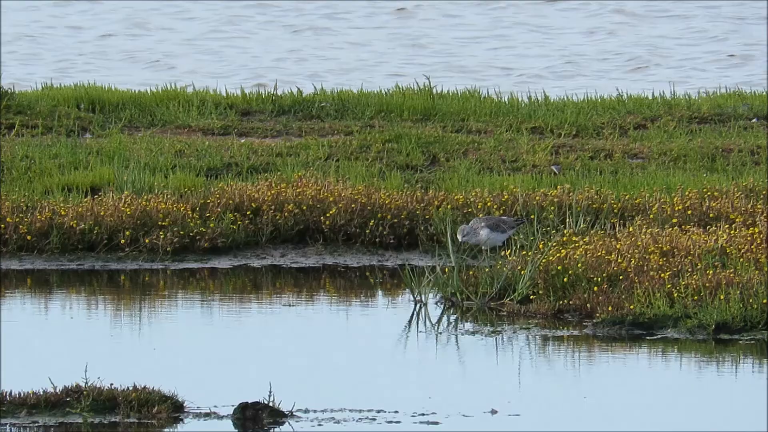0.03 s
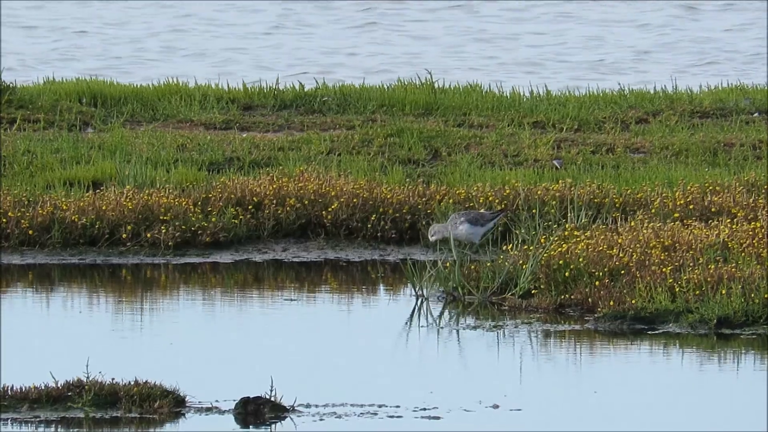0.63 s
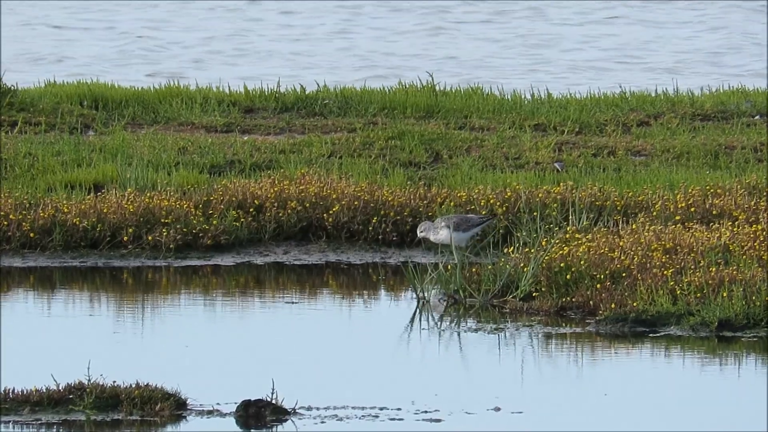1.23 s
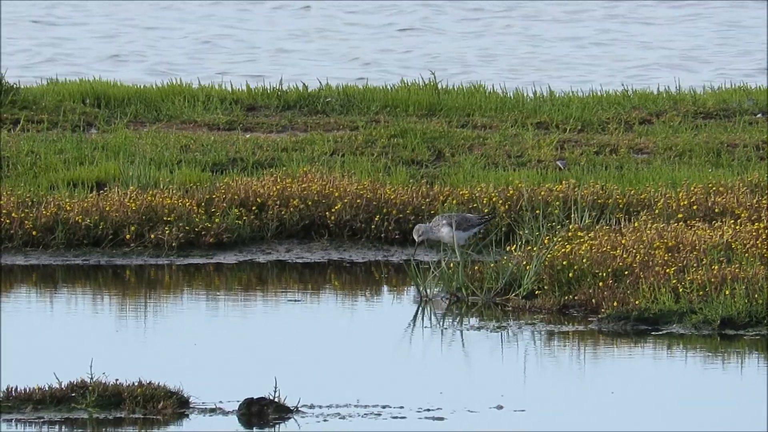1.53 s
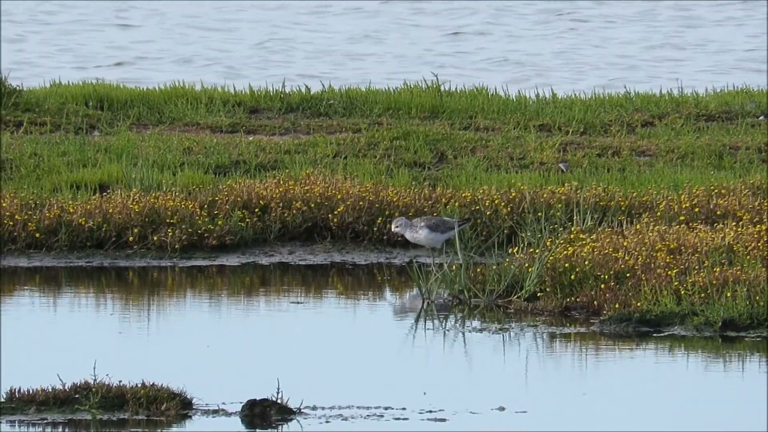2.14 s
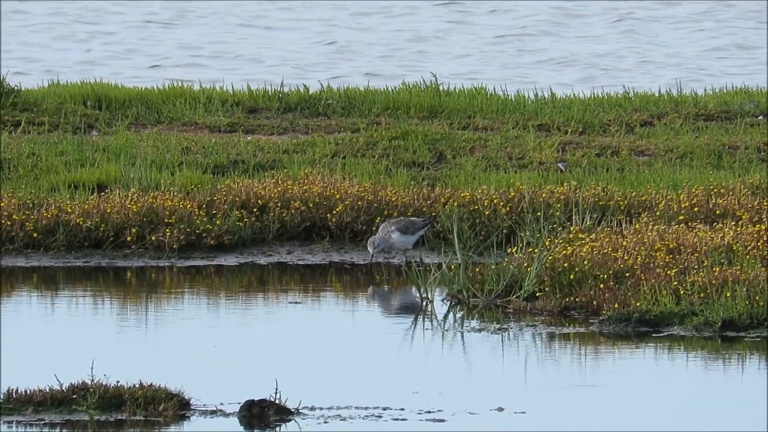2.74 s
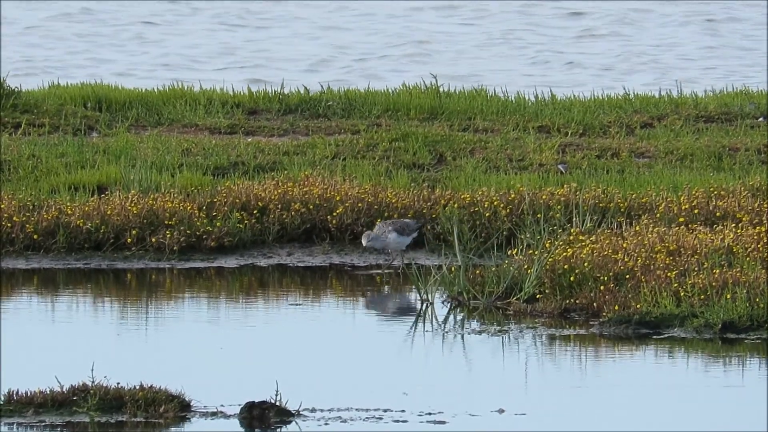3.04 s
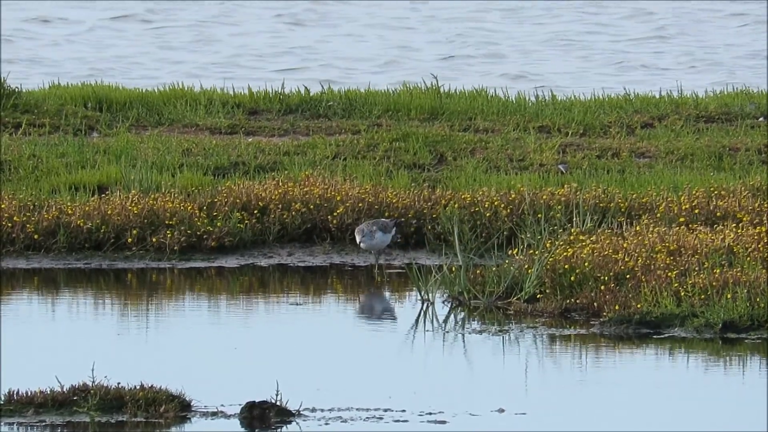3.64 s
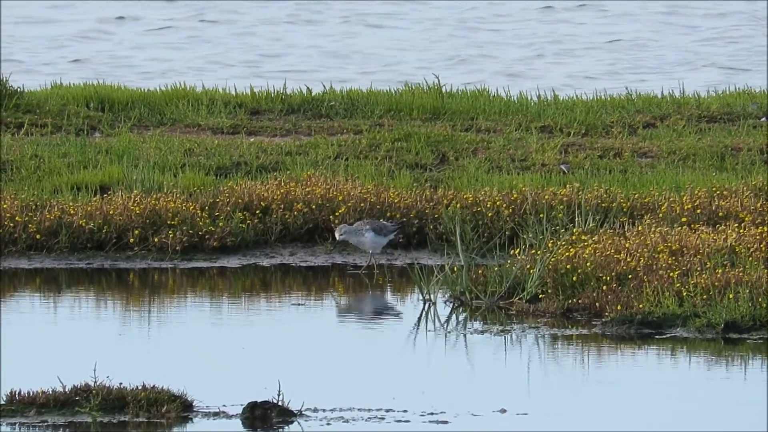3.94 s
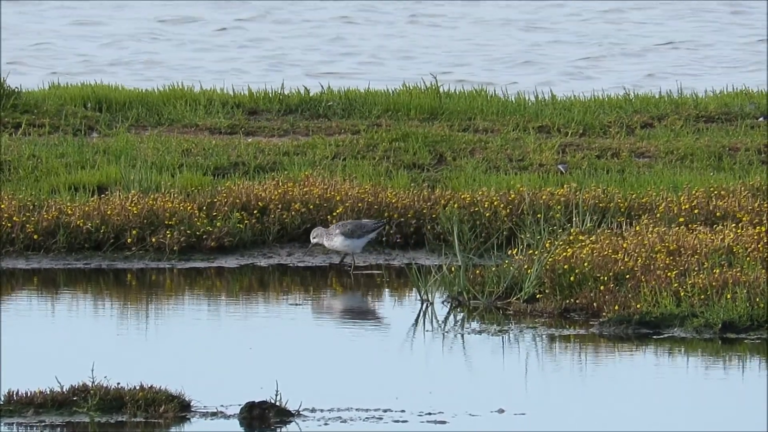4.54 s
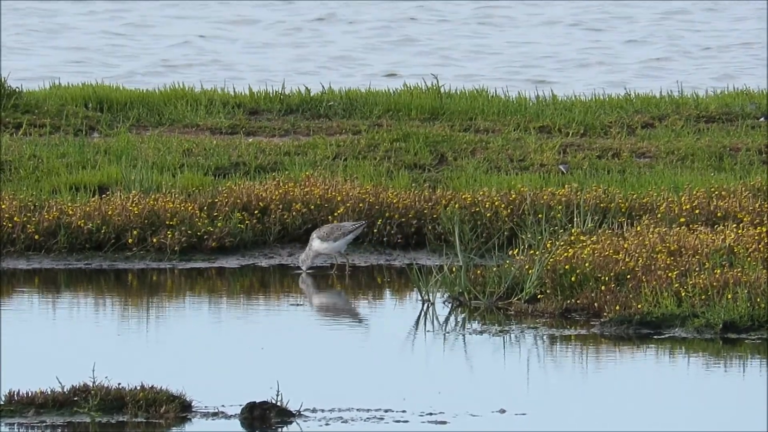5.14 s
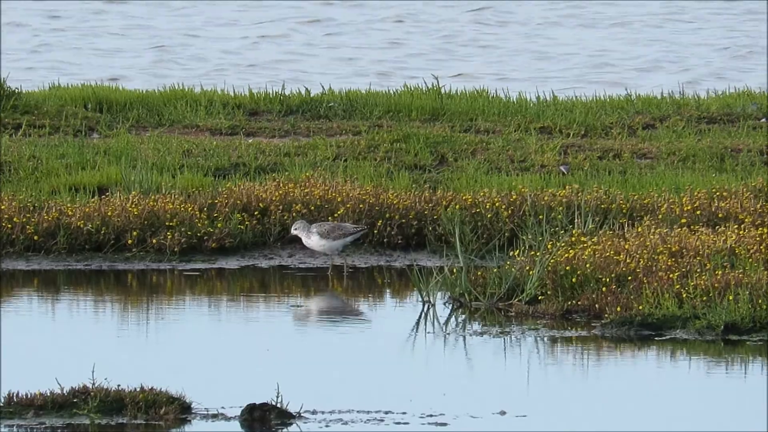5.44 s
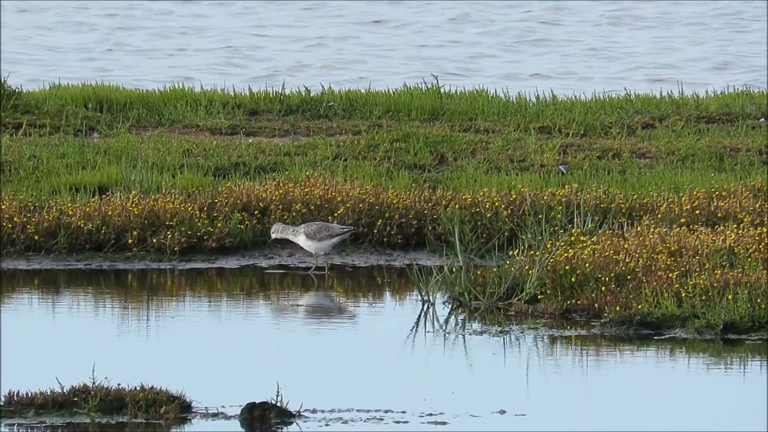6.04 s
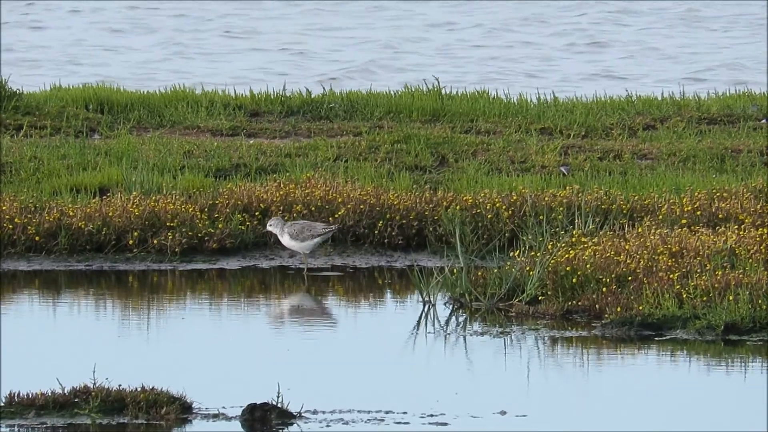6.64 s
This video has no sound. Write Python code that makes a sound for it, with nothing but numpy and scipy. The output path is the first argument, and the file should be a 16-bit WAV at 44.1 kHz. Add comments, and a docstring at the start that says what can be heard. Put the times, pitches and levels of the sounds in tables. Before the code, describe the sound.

A small bird chirps and whistles over harsh, overlapping gull calls, a soft marsh wash and low wind buffeting.

```python
"""A colony of gulls rasps across a salt marsh: each call is a fluttering harmonic series, shaped by
the resonances of throat and bill. Closer by, a small songbird twitters, modulating the nearly pure tone
of its syrinx into whistles, flicks, ticks, arches, scratches, chips, buzzes and two-voiced notes.
Grass and banks scatter the calls over a wash of distant colony and air. Gusts buffet the two
microphone ports with low rumbles and thuds, and the sound fades in at the start."""
import sys
import numpy as np
from scipy import signal
from scipy.fft import rfft, irfft, next_fast_len
from scipy.io import wavfile
from scipy.ndimage import map_coordinates

SR = 44100
rng = np.random.default_rng(int(sys.argv[2]) if len(sys.argv) > 2 else 0)


def master(y):
    """Save y as 16-bit WAV."""
    cut = np.clip(np.atleast_2d(y).T, -1, 1)
    pcm = np.round(cut * 32767)  # scale
    wavfile.write(sys.argv[1], SR, pcm.astype(np.int16))


N = 303849

# Noise spectra. Each row: frequency in Hz, spectral density in relative dB.
WASH_SPECTRUM = [(25, -0.5), (70, 9), (280, 1.5), (430, 4.5), (560, -4.5), (800, 5.5), (1000, -2.5),
                 (1400, 0), (1850, 2), (2500, -7), (4100, -8), (5300, -18), (14000, -34)]
LIGHT_WIND_SPECTRUM = [(25, -27), (80, -1), (150, -7.5), (280, -23.5), (800, -84)]
HARD_WIND_SPECTRUM = [(30, -31), (70, -7), (150, 9), (250, 3.5), (470, -12), (600, -28.5), (2000, -100)]
# Likeness of left and right. Each row: frequency in Hz, correlation from 0 to 1.
WASH_COHERENCE = [(100, 1), (400, 0.35), (1200, 0.77), (4500, 0.38), (7500, 0.0167)]
WIND_COHERENCE = [(30, .8), (140, .45), (280, .1)]
# The breeze between gusts. Each row: time in seconds, level in dB.
BREEZE = [(.5, -60.5), (2.8, -47.5), (3.0, -63), (3.85, -65), (4.1, -49), (4.95, -43), (5.65, -56)]
# Gusts. Each row: start and length in seconds, level in dB, hardness from 0 to 1.
GUSTS = [(0.629, 0.28, -37, 0.08), (0.856, 0.11, -24.5, 0.18), (0.963, 0.14, -27, 0.7),
         (1.205, 0.25, -40, 0.05), (1.653, 0.07, -33.5, 0), (2.026, 0.19, -34.5, 0.46),
         (2.345, 0.31, -36, 0.07), (4.471, 0.044, -31, 0.04), (4.505, 0.086, -19, 1),
         (4.555, 0.13, -36, 0.45), (5.188, 0.2, -33, 1), (5.344, 0.27, -38.5, 0.97),
         (5.749, 0.1, -35, 0.66), (6.004, 0.29, -35.5, 0.88), (6.543, 0.37, -29.5, 0.96)]
# Single eddies. Each row: time in seconds, peak in dB, centre frequency in Hz.
EDDIES = [(1.098, -10.5, 186), (4.532, -3.5, 280), (4.547, -7, 230), (5.222, -10, 337), (5.333, -7.5, 280),
          (6.773, -10, 251)]
# Resonances of a gull's throat. Each row: frequency in Hz, gain in dB.
THROAT = [(600, -24), (1120, -5), (1400, -9), (1850, 2), (2300, -2), (2700, -9), (3200, -12), (3700, -13),
          (4350, -5.5), (4850, -12), (5500, -26), (7000, -32), (10000, -48)]
# Nearer gulls. Each row: start and length in seconds, pitch aimed at in Hz, level in dB,
# harshness from 0 to 1, treble gain in dB.
GULL_CALLS = [(0.486, 0.94, 636.7, -53.5, 0.32, 3.5), (1.168, 0.39, 1097, -45.5, 0.69, -5.5),
              (1.675, 0.3, 920, -54.5, 0, -27), (1.963, 0.5, 1065, -42, 0.99, 4),
              (2.707, 0.23, 972, -50.5, 0.15, 0), (3.156, 0.27, 1127, -46.5, 0.56, 6),
              (3.318, 0.19, 925, -42.5, 0.8, 4), (3.42, 0.43, 1170, -44, 0.98, -2),
              (4.016, 0.43, 1165, -40, 0.71, -2.5), (4.895, 0.32, 975, -45.5, 0.89, -2),
              (5.117, 0.25, 1152, -42.5, 0.85, 0), (5.932, 0.19, 919, -42, 0.4, -10),
              (6.051, 0.28, 1151, -46, 0.74, -3), (6.263, 0.64, 1145, -41.5, 0.83, -1)]
# Clear cries. Each row: start and length in seconds, pitch in Hz, level and relative octave in dB.
CRIES = [(2.17, 0.13, 2126, -40, 0), (3.485, 0.15, 2040, -44.5, -6.5), (4.804, 0.14, 2070, -42.5, -8.5),
         (5.981, 0.13, 2070, -34, -25)]
# The contour of a cry. Each row: share of its length, pitch ratio, gain in dB.
CRY_SHAPE = [(0, .98, -1), (.32, 1, 0), (.5, 1.08, -4), (.64, 1.16, -7), (1, 1.07, -15)]
# Runs of pips. Each row: start and length in seconds, pips per second, base level in dB,
# growth of the fundamental over the run in dB.
STUTTERS = [(5.839, .032, 111, -42, 0), (5.889, .085, 52.6, -39.5, 6)]
# Held whistles. Each row: start and length in seconds, middle pitch in Hz, overall glide in Hz,
# bend of the middle above the ends in Hz, level in dB.
WHISTLES = [(0.227, 0.08, 3730, 750, -120, -41.5), (0.956, 0.097, 3610, 6, -130, -47),
            (1.494, 0.039, 3570, 700, -60, -46.5), (1.631, 0.049, 4050, -42, -42, -44.5),
            (1.897, 0.046, 5400, 1150, 2, -62)]
# Notes of fixed length. Each row: start in seconds, level in dB.
FLICKS = [(0.267, -40), (0.319, -41), (0.868, -48.5), (1.01, -47), (1.322, -47), (1.518, -52), (1.662, -45),
          (1.88, -42)]
SCRATCHES = [(3.08, -47), (4.952, -46), (5.038, -45), (5.119, -45)]
# Falling ticks. Each row: start in seconds, top pitch in Hz, level in dB.
TICKS = [(2.35, 4150, -46.5), (3.853, 4240, -47), (4.318, 4180, -48), (4.354, 3430, -46.5)]
# Four ticks, high-low-low-high. Each row: delay in seconds, top pitch in Hz, level in dB.
TICK_FIGURE = [(0, 4290, -47), (0.042, 3090, -48.5), (0.083, 3000, -49), (.122, 3770, -46)]
# Each entry: start of one such figure in seconds.
FIGURE_STARTS = [2.455, 4.453]
# Arched notes. Each row: start in seconds, level in dB before the note's lift.
ARCHES = [(2.712, -67), (2.869, -65), (4.719, -62), (4.859, -64), (5.076, -64.5), (5.259, -64.5)]
# Nasal chips. Each row: start and length in seconds, level in dB.
CHIPS = [(3.145, 0.06, -45), (3.67, 0.055, -47), (3.914, 0.077, -44.5)]
# Buzzes. Each row: start and length in seconds, first and last pitch in Hz, level in dB.
BUZZES = [(3.621, 0.029, 3900, 3800, -46.5), (6.103, 0.044, 3760, 3760, -45)]
# Two-voiced notes. Each row: start in seconds, level in dB, relative upper voice in dB.
CHINKS = [(5.504, -45, -29), (5.728, -43, -9), (5.968, -43, -19), (6.212, -41.5, -6.5), (6.479, -47.5, -18)]
# The fade-in. Each row: time in seconds, gain in dB.
FADE_IN = [(.095, -70), (.125, -26), (.46, -11), (.52, 0)]

NOTE_SCATTER = .02  # relative spread of pitch among repeated notes


def amp(db):
    """Decibels to amplitude ratio."""
    return 10 ** (np.asarray(db) / 20)


def unit(x):
    """Normalisation to rms 1."""
    return x / np.sqrt(np.mean(x ** 2) + 1e-20)


def along(points, hz):
    """Interpolation of (Hz, value) points on a log axis."""
    f, v = np.transpose(points)
    return np.interp(np.log(hz + 1), np.log(f + 1), v)


def curve(rows):
    """Interpolation of (seconds, value) rows at every sample."""
    return np.interp(np.arange(N) / SR, *np.transpose(rows))


def wobble(rate, size):
    """Smooth random modulation, rate knots a second."""
    knots = rng.standard_normal(int(size * rate / SR) + 4)
    return map_coordinates(knots, [np.arange(size) * rate / SR])


def filtered(x, response):
    """Linear filtering: the spectrum times a frequency response."""
    size = x.shape[-1]
    m = next_fast_len(size + SR // 10)
    return irfft(rfft(x, m) * response(np.fft.rfftfreq(m, 1 / SR)), m)[..., :size]


def rush(spectrum, coherence):
    """Stereo noise of rms 1; the balance of mid and side sets its coherence."""
    def response(hz):
        angle = np.arccos(np.clip(along(coherence, hz), -1, 1)) / 2
        return amp(along(spectrum, hz)) * [np.cos(angle), np.sin(angle)]
    mid, side = filtered(rng.standard_normal((2, N)), response)
    return unit(np.array([mid + side, mid - side]))


def add(track, s, sound):
    """Superposition of a sound on a track from s seconds."""
    start = max(round(s * SR), 0)
    room = track[start:start + len(sound)]
    room += sound[:len(room)]


def progress(length):
    """Normalised time, 0 to 1 over length seconds."""
    return np.linspace(0, 1, max(int(length * SR), 2))


def phase(hz):
    """Phase as the integral of frequency."""
    return 2 * np.pi * np.cumsum(hz) / SR


def swell(u):
    """An envelope with a soft start and end."""
    return np.sqrt(np.abs(np.sin(np.pi * u)))


def arch(u, foot_hz, middle_hz):
    """A parabolic pitch contour, turning at mid-note."""
    return middle_hz + (foot_hz - middle_hz) * (2 * u - 1) ** 2


def syrinx(pitch_hz, overtone_db=-31, waver=.011):
    """A nearly sinusoidal oscillation of rms 1, with jitter in pitch and shimmer in strength."""
    size = len(pitch_hz)
    p = phase(pitch_hz * (1 + waver * wobble(373.7, size)))
    overtones = amp(overtone_db) * np.sin(2 * p) + amp(2.1 * overtone_db) * np.sin(3 * p)
    return unit(amp(2.2 * wobble(190, size)) * (np.sin(p) + overtones))


def marsh_wash(level_db=-48.9):
    """Incoherent sources, the distant colony and the air, sum to nearly steady noise."""
    return amp(level_db + wobble(4.33, N) / 2) * rush(WASH_SPECTRUM, WASH_COHERENCE)


def wind(lump_db=3.8, sway_db=3, edge_s=.012):
    """Turbulent pressure at the ports: abrupt gusts over a breeze; hard ones reach higher frequencies."""
    light, hard = amp(curve(BREEZE) + sway_db * wobble(36, N)), np.zeros(N)
    for s, length, db, hardness in GUSTS:
        u = progress(length)
        edges = np.minimum(1, np.minimum(u, 1 - u) * length / edge_s)
        push = amp(db) * unit(edges * swell(u) * amp(lump_db * wobble(42.1, len(u))))
        add(light, s, np.sqrt(1 - hardness) * push)
        add(hard, s, np.sqrt(hardness) * push)
    rumble = light * rush(LIGHT_WIND_SPECTRUM, WIND_COHERENCE)
    return rumble + hard * rush(HARD_WIND_SPECTRUM, WIND_COHERENCE)


def gull(length, top_hz, harsh, treble_db, rise_s=.014, hold=.42, rest_hz=506, sag_s=.48, rattle_hz=64):
    """Source and filter: a rattling voice rises and sags; its resonance drops as the bill closes."""
    u = progress(length)
    t, size = u * length, len(u)
    closing = np.clip((u - hold) / (1 - hold), 0, 1)
    effort = amp(-10 * closing) * (1 - np.exp(-t / rise_s)) * np.minimum(1, 10 * (1 - u))
    strain = harsh * np.sqrt(effort)
    rattle = phase(rattle_hz * np.exp(.14 * rng.normal() + .34 * wobble(90, size)))
    sag_hz = (top_hz - rest_hz) * (1 - np.exp(-length / sag_s))
    pitch = (top_hz - sag_hz * u ** 1.5) * (1 - .22 * np.exp(-t / rise_s / 3))
    shake = (.014 + .022 * strain) * np.sin(rattle + 1) + .032 * strain * wobble(520, size)
    p = phase(pitch * (1 + .012 * wobble(18, size) + shake))

    def partial(k):
        """A shimmering line at k times the pitch; fractional ones also wander in phase."""
        shimmer = amp((2 + 2 * strain) * wobble(70, size))
        offset = rng.uniform(0, 2 * np.pi)
        wander = k % 1 * 3 * strain * wobble(60, size)
        return shimmer * np.sin(k * p + offset + wander)

    # period tripling: under strain the syrinx repeats only every third cycle
    subharmonics = sum(partial(k / 3) for k in range(4, 28) if k % 3)
    voice = unit(sum(partial(k) for k in range(1, 10)) + (.1 + .8 * strain) * subharmonics)
    pulsed = voice * amp((1.2 + 2 * strain) * np.cos(rattle) + 1.5 * wobble(45, size))

    def bill(ring_hz, ring_db):
        """The voice filtered by the throat and one resonance of the bill."""
        throat = lambda hz: along(THROAT, hz) + treble_db * np.log2(np.clip(hz / 2000, 1, 2))
        ring = lambda hz: ring_db * np.exp(-((hz - ring_hz) / 300) ** 2)
        return filtered(pulsed, lambda hz: amp(throat(hz) + ring(hz)))

    return effort * unit((1 - closing) * bill(2300, 2) + closing * bill(1550, 5))


def colony(far_db=-55, far_count=38):
    """Superposition of the nearer gulls and many fainter, smoother calls far off."""
    out = np.zeros(N)
    for s, length, top_hz, db, harsh, treble_db in GULL_CALLS:
        add(out, s, amp(db) * gull(length, top_hz, harsh, treble_db))
    for i, (when, size, pitch, rough, near) in enumerate(rng.random((far_count, 5))):
        call = gull(.25 + .3 * size, 760 + 380 * pitch, .25 * rough, treble_db=-1)
        add(out, (i + when) / far_count * N / SR, amp(far_db + 6 * (near - .5)) * call)
    return out


def shore_echo(birds, banks_s=.45, grass_s=.09):
    """Reverberation: quick scatter off the grass and a faint tail from the banks, different per ear."""
    t = np.arange(SR // 2) / SR
    banks = rng.standard_normal((2, len(t))) * amp(-60 * t / banks_s)
    grass = rng.standard_normal(len(t)) * amp(-60 * t / grass_s) * (t > .003)
    response = amp(-14) * banks / np.linalg.norm(banks[0]) + amp(-12) * grass / np.linalg.norm(grass)
    return signal.fftconvolve(birds[None], response, axes=1)[:, :N]


def whistles(out):
    """Sustained oscillation whose pitch glides and bends."""
    for s, length, hz, glide_hz, bend_hz, db in WHISTLES:
        u = progress(length)
        pitch = arch(u, hz - bend_hz, hz) + glide_hz * (u - .5)
        add(out, s, amp(db) * swell(u) * syrinx(pitch, waver=.02))


def flicks(out, length=.02, from_hz=2500, to_hz=4150):
    """Fast upward frequency sweeps."""
    u = progress(length)
    for s, db in FLICKS:
        pitch = (1 + NOTE_SCATTER * rng.normal()) * (from_hz + (to_hz - from_hz) * u ** 1.5)
        add(out, s, amp(db) * swell(u) * syrinx(pitch, waver=.03))


def thuds(lag_s=.00063, cutoff_hz=600):
    """Each eddy is one pressure dip; the stronger it is, the more the two ports differ in timing."""
    out = np.zeros((2, N))
    t = np.arange(-SR // 20, SR // 20) / SR
    for (s, db, eddy_hz), side in zip(EDDIES, np.sign(rng.standard_normal(len(EDDIES)))):
        for port, sign in zip(out, (side, -side)):
            u = np.pi * eddy_hz * (t + sign * lag_s * np.sqrt(amp(db)))
            add(port, s + t[0], amp(db) * (2 * u * u - 1) * np.exp(-u * u))
    return filtered(out, lambda hz: 1 / (1 + (hz / cutoff_hz) ** 10))


def gull_cries(out, flutter_hz=88):
    """Upslurred tones that start rough and clear as their amplitude modulation dies away."""
    share, ratio, shape_db = np.transpose(CRY_SHAPE)
    for s, length, hz, db, octave_db in CRIES:
        u = progress(length)
        flutter = 1 + 1.2 * (1 - u) ** 4 * np.sin(2 * np.pi * flutter_hz * length * u - 2)
        pitch = hz * np.interp(u, share, ratio)
        tone = amp(np.interp(u, share, shape_db)) * syrinx(pitch, overtone_db=-18)
        octave = amp(octave_db) * u * syrinx(2 * pitch)
        add(out, s, amp(db) * swell(u) * flutter * (tone + octave))


def ticks(out, length=.027, rest_hz=2250, fall=.74):
    """Short downward sweeps, part of the way toward a resting pitch."""
    u = progress(length)
    figures = [(start + s, hz, db) for start in FIGURE_STARTS for s, hz, db in TICK_FIGURE]
    for s, hz, db in list(TICKS) + figures:
        add(out, s, amp(db) * swell(u) * syrinx(hz - fall * (hz - rest_hz) * u ** 2, waver=.03))


def arches(out, length=.078, foot_hz=2700, top_hz=3850, lift_db=18, fade_db=9):
    """Biphonation: the two sides of the syrinx rise and fall together at different pitches."""
    u = progress(length)
    for s, db in ARCHES:
        pitch = (1 + NOTE_SCATTER * rng.normal()) * arch(u ** 1.6, foot_hz, top_hz)
        voices = syrinx(pitch, waver=.02) + amp(-7) * syrinx(1.21 * pitch, waver=.025)
        add(out, s, amp(db + lift_db - fade_db * u) * swell(u) * voices)


def scratches(out, length=.048, centre_hz=3200):
    """Fast random frequency modulation spreads a tone into a noisy band."""
    u = progress(length)
    for s, db in SCRATCHES:
        pitch = centre_hz * (1 + .1 * wobble(1500, len(u)))
        add(out, s, amp(db) * swell(u) * syrinx(pitch, overtone_db=-20, waver=.1))


def chips(out, pitch_hz=870):
    """Harmonics 3 to 5 over a missing fundamental give a nasal timbre."""
    for s, length, db in CHIPS:
        u = progress(length)
        p = phase(pitch_hz * (1 - .3 * (u - .4) ** 2 + NOTE_SCATTER / 2 * wobble(300, len(u))))
        harmonics = sum(np.sin((k + 3) * p) / 3 ** k for k in range(3))
        add(out, s, amp(db) * swell(u) * unit(harmonics))


def buzzes(out, beat_hz=84, deviation_hz=170):
    """Periodic modulation of amplitude and frequency gives a tone buzzing sidebands."""
    for s, length, start_hz, end_hz, db in BUZZES:
        u = progress(length)
        beat = 2 * np.pi * beat_hz * length * u
        pitch = start_hz + (end_hz - start_hz) * u + deviation_hz * np.sin(beat)
        add(out, s, amp(db) * swell(u) * (1 - .89 * np.cos(beat)) * syrinx(pitch))


def chinks(out):
    """The two sides of the syrinx: a short low drop, then a high slide under a thin voice a fifth up."""
    for s, db, upper_db in CHINKS:
        u = progress(.0273)
        add(out, s, amp(db) * swell(u) * syrinx(2630 + 600 * (1 - u) ** 2, waver=.012))
        u = progress(.13)
        slide = (3480 + 620 * np.exp(-u / .2)) * (1 + NOTE_SCATTER / 2 * rng.normal())
        voices = syrinx(slide, waver=.014) + amp(upper_db) * np.sin(np.pi * u) ** 2 * syrinx(1.5 * slide)
        add(out, s + .021, amp(db - 21 * u) * swell(u) * voices)


def stutter(out, pip_s=.0076, top_hz=2180, octave_db=-10.5):
    """Gating chops a bird's voice into arched pips, purer as their fundamental grows."""
    u = progress(pip_s)
    for s, length, rate, db, growth_db in STUTTERS:
        for t in np.arange(0, length, 1 / rate):
            p = phase(arch(u, .75 * top_hz, top_hz) * (1 + NOTE_SCATTER * rng.normal()))
            pip = amp(growth_db * t / length) * np.sin(p) + amp(octave_db) * np.sin(2 * p)
            add(out, s + t, 2 * amp(db) * np.sin(np.pi * u) ** 2 * pip)


def scene():
    """Superposition of the birds, their reflections, the wash and the wind."""
    birds = colony()
    for add_notes in (whistles, flicks, gull_cries, ticks, arches, scratches, chips, buzzes, chinks):
        add_notes(birds)
    stutter(birds)
    return birds + shore_echo(birds) + marsh_wash() + wind() + thuds()


def record(dry, top_hz=14400):
    """A short fade-in and a sharp low-pass band limit."""
    return filtered(dry * amp(curve(FADE_IN)), lambda hz: hz < top_hz)


dry = scene()
out = record(dry)
master(out)
```